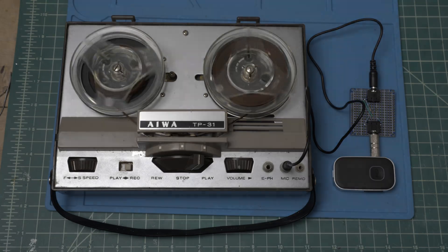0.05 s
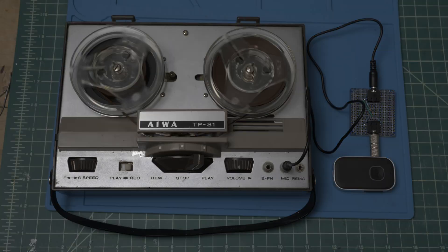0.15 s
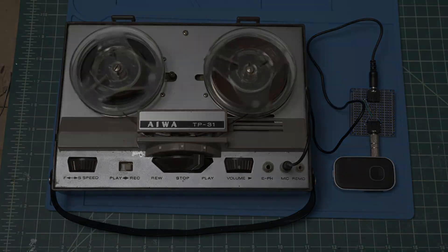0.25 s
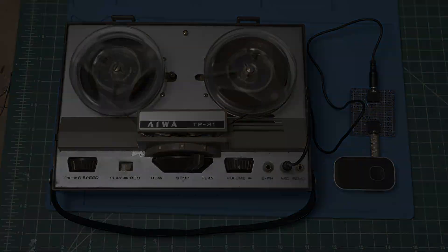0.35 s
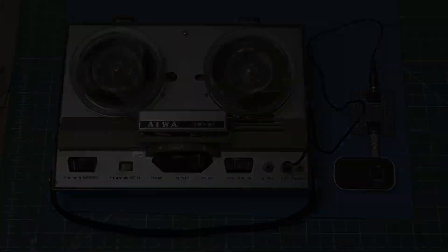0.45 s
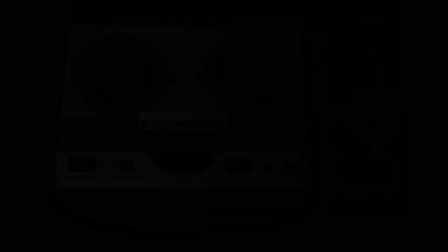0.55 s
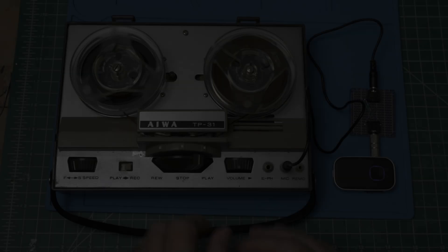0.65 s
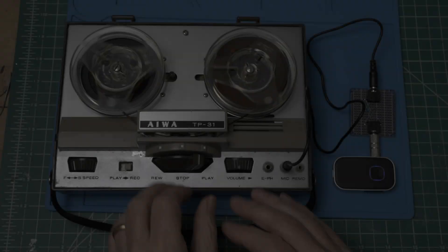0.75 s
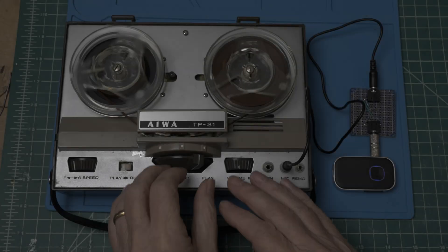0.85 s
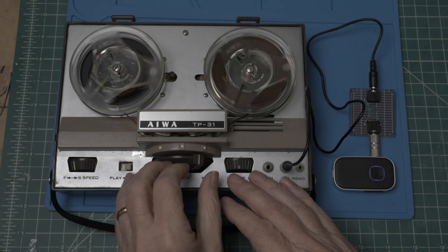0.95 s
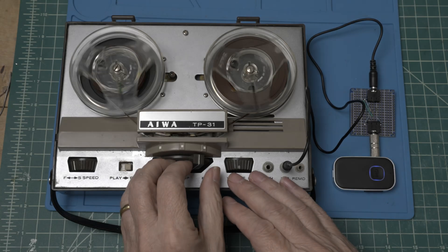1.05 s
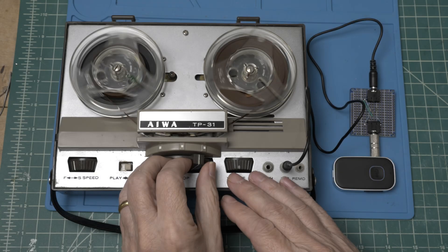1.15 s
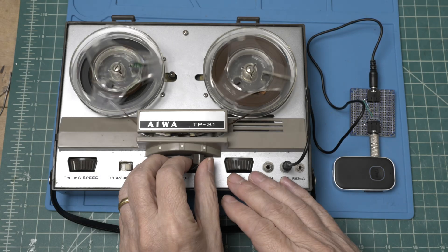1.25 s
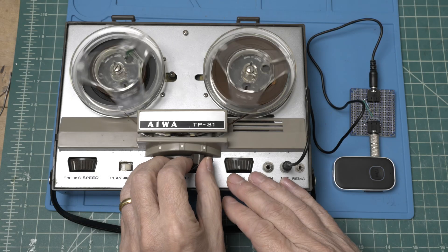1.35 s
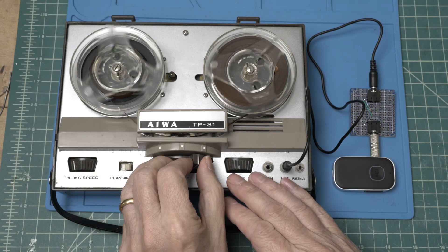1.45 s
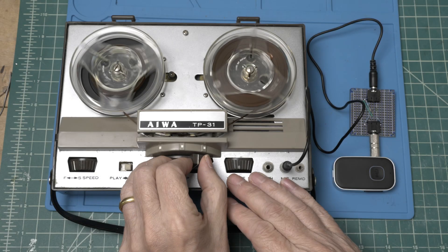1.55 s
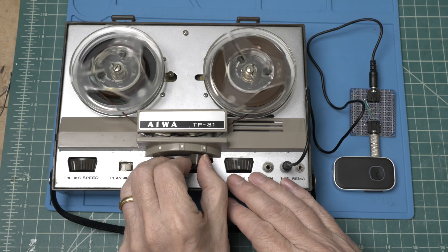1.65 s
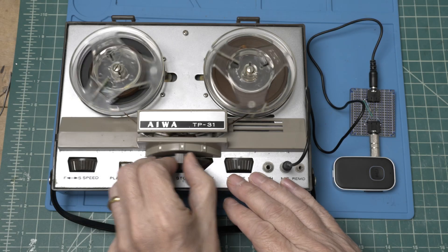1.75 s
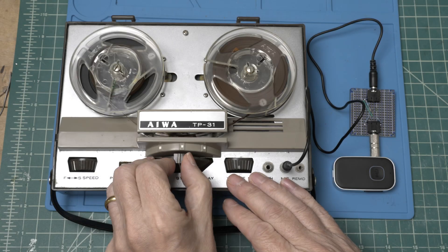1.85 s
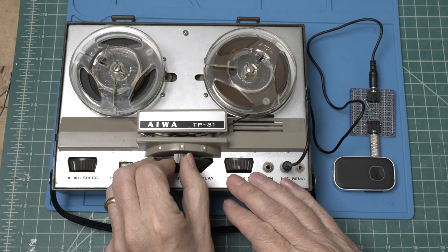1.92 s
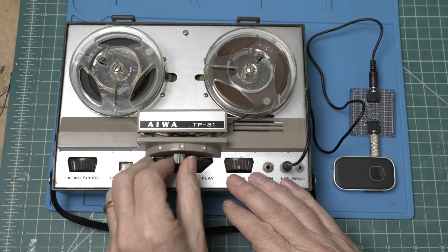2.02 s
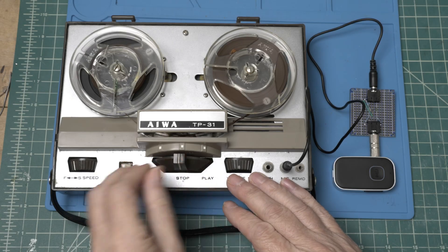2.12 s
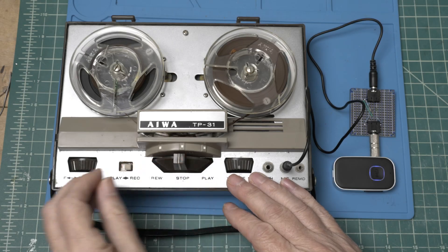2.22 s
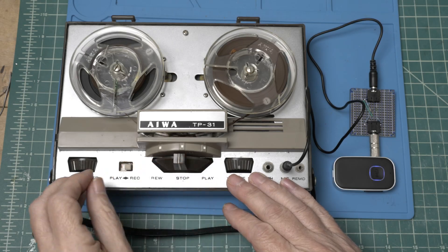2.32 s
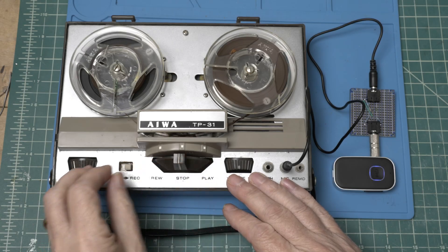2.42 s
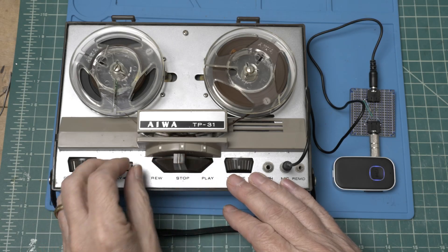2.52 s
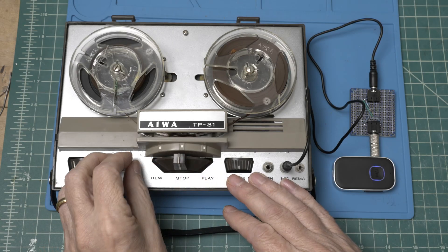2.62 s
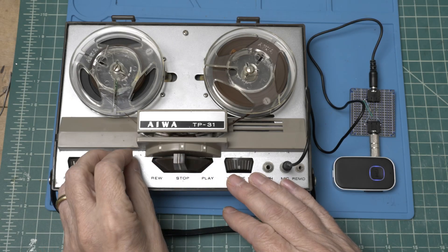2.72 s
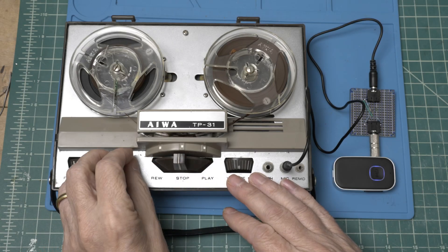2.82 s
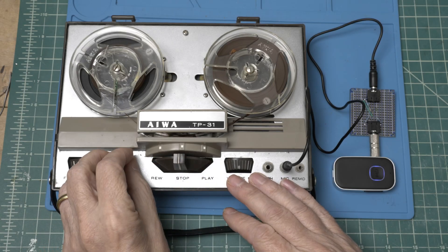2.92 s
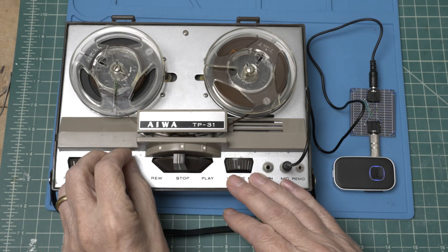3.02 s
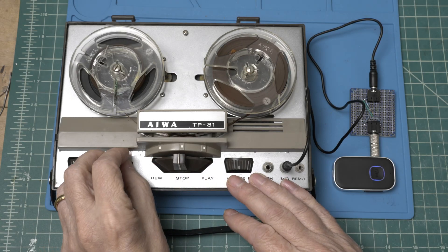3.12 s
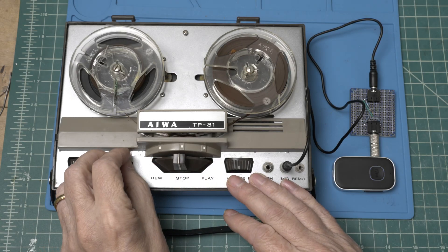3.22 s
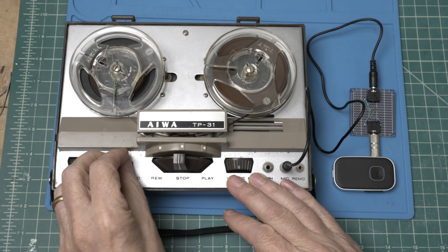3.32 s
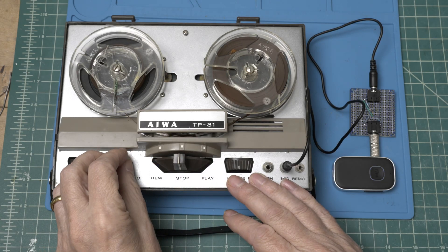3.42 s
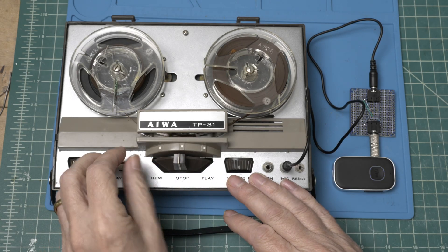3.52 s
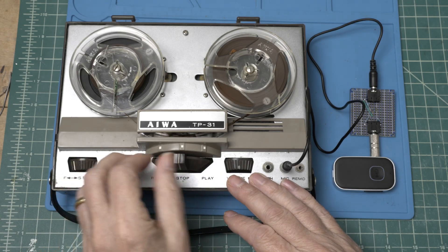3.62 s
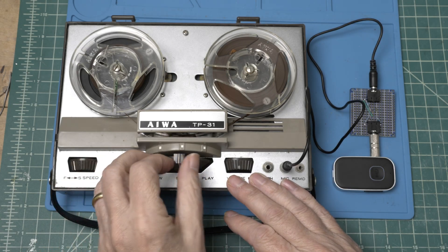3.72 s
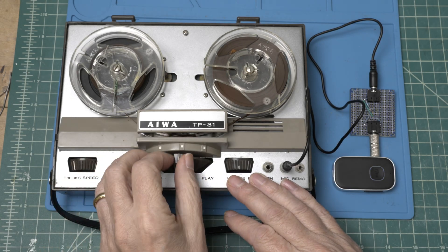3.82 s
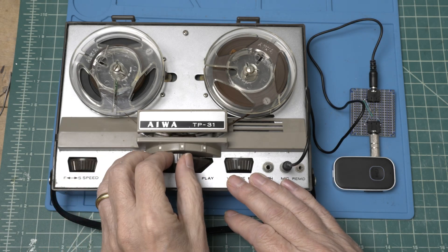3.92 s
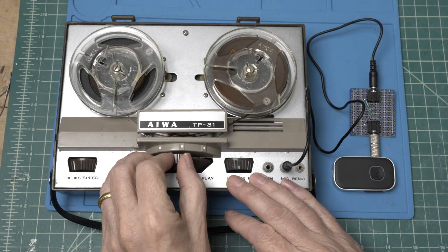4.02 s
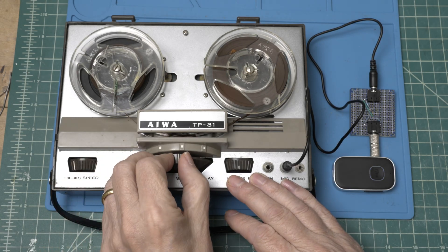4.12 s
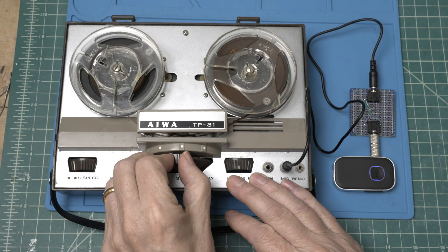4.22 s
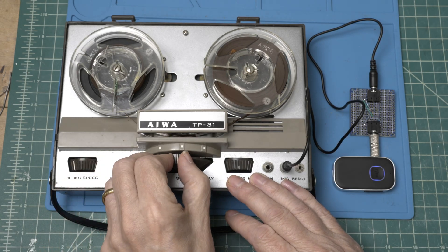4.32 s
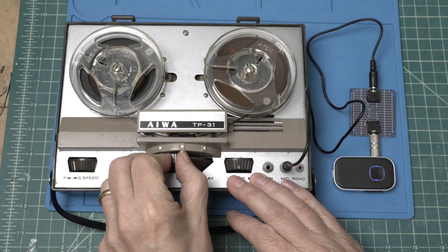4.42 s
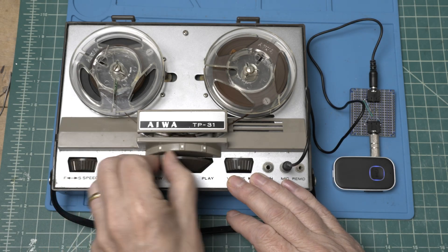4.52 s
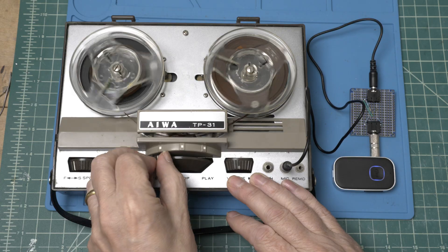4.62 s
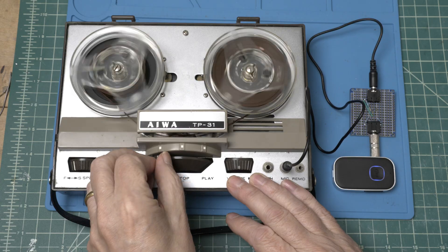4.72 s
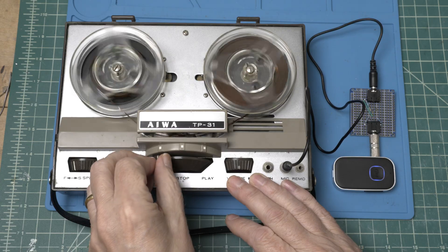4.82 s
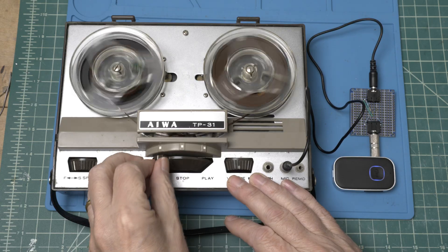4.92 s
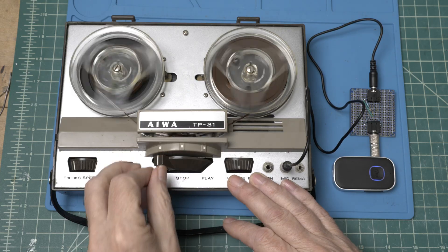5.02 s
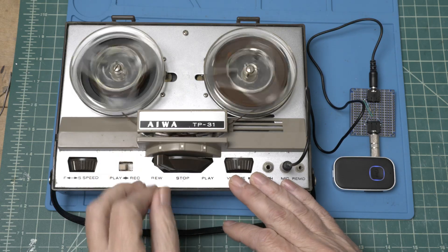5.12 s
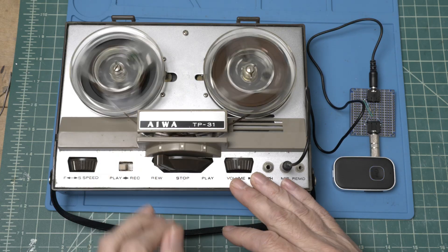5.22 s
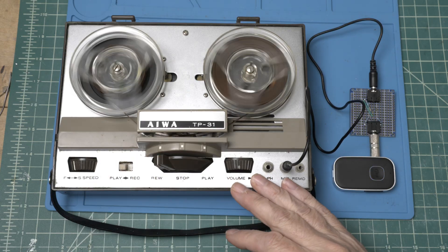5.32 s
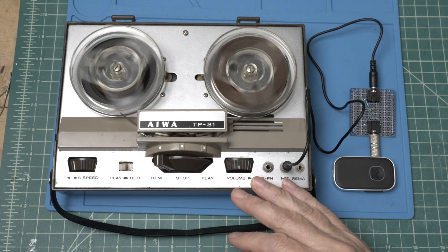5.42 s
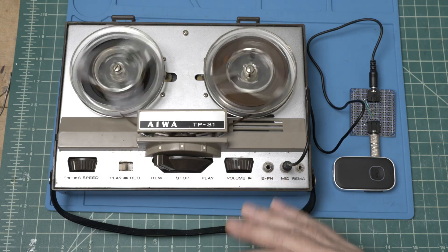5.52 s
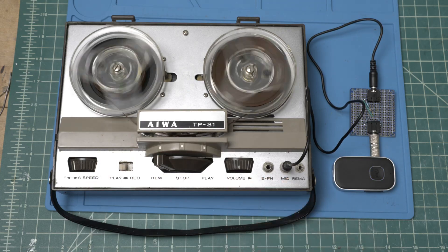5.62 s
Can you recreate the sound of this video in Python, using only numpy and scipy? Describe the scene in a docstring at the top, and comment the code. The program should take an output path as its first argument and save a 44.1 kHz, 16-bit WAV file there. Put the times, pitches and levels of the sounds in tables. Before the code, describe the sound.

Close mechanical clunks and a sharp switch click on a reel-to-reel tape recorder, followed by reels whirring up to speed with a few ticks.

```python
"""On a workbench in a small room, a little reel-to-reel tape recorder, heard up close.
Its motor brushes scratch quietly until fingers turn the lever to stop: the linkage knocks and a spring
pings. A slide switch snaps, then the lever clunks into rewind. The rim drive rattles the chassis,
surging on each turn as the reels gather speed and now and then tick and brush the tape.
Room air, mains hum and a low bench rumble lie underneath."""
import sys
import numpy as np
from scipy import signal
from scipy.fft import rfft, irfft
from scipy.io import wavfile

SR = 44100
rng = np.random.default_rng(int(sys.argv[2]) if len(sys.argv) > 2 else 0)


def materialize(psi):
    """Save the field psi as 16-bit PCM at rate SR to the path in sys.argv[1].

    A 1-D psi becomes a single channel; in a 2-D psi each row is a channel.
    """
    bounded = np.clip(np.atleast_2d(psi).T, -1, 1)
    quanta = np.round(bounded * 32767).astype(np.int16)
    wavfile.write(sys.argv[1], SR, quanta)


N = 249517

# Tone curves of the noisy layers. Each row: frequency in Hz, gain in dB.
AIR_EQ = [(20, -23), (45, -13.5), (90, -0.5), (200, -11), (400, -10), (700, -14.5), (1100, -13.5),
          (2300, -23), (3600, -19.5), (5000, -32.5), (12000, -29), (16000, -28)]
MOTOR_EQ = [(180, -72.5), (300, -41), (511, -8.5), (555, -17), (584, 2.5), (828, -28.5), (1010, -25.5),
            (1250, -10), (1510, -29), (1780, -6), (2280, -2.5), (5340, -9.5), (6300, -21.5), (10400, -14.5),
            (16000, -39.5)]
FINGER_EQ = [(180, -39), (300, -19), (593, -7.5), (801, -16), (961, 1.5), (1060, -2.5), (2320, -3.5),
             (6200, -16), (10400, -20.5), (16000, -28)]
PANEL_EQ = [(30, -57.5), (100, -31), (330, -32), (450, -8.5), (700, -5.5), (1500, -5), (2200, -5),
            (3200, 0), (4500, -14.5), (7000, -20), (11000, -26.5), (16000, -35)]   # the many small resonances between the chassis modes
SCRAPE_EQ = [(400, -36.5), (1500, -13.5), (3000, -5.5), (4200, -5.5), (6000, -18.5), (9000, -35),
             (16000, -43)]   # bright edge of the linkage
SWITCH_EQ = [(150, -32), (380, -27.5), (550, -14), (1000, -8.5), (2000, -11), (3400, 1.5), (4600, -8.5),
             (7000, -8), (11000, -11.5), (16000, -23)]
SWITCH_TAIL_EQ = [(150, -30), (500, -27), (1100, -6), (2000, -9), (3500, 0.5), (5800, 5), (8000, -8.5),
                  (11000, -10), (16000, -23.5)]
# Bodies that ring. Each row: frequency in Hz, width in Hz, gain in dB.
BENCH_MODES = [(62, 9, -3.5), (80, 11, 1), (132, 12, -7), (172.6, 16, -12), (208, 17, -8.5), (247, 4, -13)]
MOTOR_HOUSING_MODES = [(588, 14, -5), (965, 17, -8), (1250, 23, -11.5), (1830, 30, -11), (2314, 60, 0.5),
                       (3000, 160, 1), (3290, 50, -2), (3613, 99, 3), (4350, 24, -11), (5280, 250, -11.5),
                       (6960, 150, -11.5), (9045, 80, -17.5), (10300, 500, -23)]
CHASSIS_MODES = [(419.2, 27, -0.5), (462.4, 26, 5.5), (532.6, 52, 2), (597, 40, 0.5), (676, 58, -2),
                 (739, 15, -0.5), (920, 40, -7), (972, 22, 2), (1315, 40, -5), (1470, 45, -5),
                 (1664, 25, -6), (2180, 16, 0.5), (2529, 36, -1.5), (2678, 55, 4.5), (2850, 23, -2.5),
                 (3137, 90, 4.5), (3260, 80, -2), (3540, 63, -14), (4140, 30, -12.5), (4450, 35, -17)]
# Mains hum. Each row: frequency in Hz, rms level in dB once fully swelled.
HUM_PARTIALS = [(60, -80.5), (120, -67), (240, -85.5)]
# The motor's slow run. Each row: time in seconds, turns per second.
MOTOR_SPEED = [(0, 34.7), (.7, 36.2)]
# Soft swells. Each row: peak time in seconds, swell time in seconds, level in dB.
FINGER_RUBS = [(.77, 0.098, -58), (.96, 0.024, -64), (1.14, 0.067, -63.5), (2.09, 0.031, -69),
               (3.54, 0.033, -72), (3.92, 0.035, -67.5), (4.295, 0.029, -47.5), (4.375, 0.014, -53.5),
               (4.555, 0.016, -54)]
HISS_SWELLS = [(2.15, .1, -70.5), (2.68, .09, -76), (4.05, .14, -76.5)]
BENCH_THUMPS = [(1.85, .04, -54.5), (4.28, .03, -55)]   # the machine rocks as the lever is turned
TAPE_SWISHES = [(4.915, 0.014, -51.5), (5.17, 0.026, -54)]
# Hits. Each row: start in seconds, case, deck plate and crack levels in dB before their trims,
# chatter length in seconds, chassis ring in dB.
CONTROL_KNOCKS = [(.928, -59, -68, -73, 0.013, -18), (1.085, -59.5, -72, -77, 0.013, -7),
                  (1.7403, -46.5, -42.5, -68, 0.0017, 3.5), (1.7588, -30.5, -22.5, -47, 0.01, -3.5),
                  (1.8155, -38.5, -41, -47, 0.0043, -4), (1.8225, -32, -43, -43.5, 0.0069, -13),
                  (3.473, -64, -62, -63.5, 0.0055, -11), (3.9055, -54, -55, -64.5, 0.0059, -20),
                  (4.254, -32, -50, -43, 0.013, -2), (4.314, -46, -55, -62, 0.0062, -7),
                  (4.399, -70, -57.5, -73, 0.0055, -18), (4.5755, -29, -23, -33.5, 0.0022, -30),
                  (4.5785, -32, -15.5, -32.5, 0.00084, -24), (4.5975, -27, -29, -33.5, 0.003, -18)]   # fingers, lever and linkage
REEL_TICKS = [(5.071, -33, -33, -54, 0.0049, -18), (5.106, -40.5, -35.5, -38.5, 0.016, 3),
              (5.3925, -26.5, -21.5, -49.5, 0.0034, -10), (5.425, -39, -35.5, -35, 0.012, -3)]   # flanges and tape catching
# Loose linkage. Each row: start in seconds, level in dB, hold in seconds, fall in dB per second.
LINKAGE_SHAKES = [(1.76, -40, 0.089, 219), (4.245, -54, 0.031, 98), (4.581, -27.5, 0.062, 131)]
# The spring. Each row: start in seconds, level in dB, pitch in Hz.
SPRING_PINGS = [(1.798, -62, 14500), (1.8153, -45, 11300), (1.844, -53, 9900)]
# The slide switch. One row: start in seconds, level in dB, chatter length in seconds.
SWITCH_SNAP = (3.1397, -23.5, 0.0046)
# Layers of the rewind. Each row: full-speed level in dB, exponent on speed, surge in dB (negative
# for a dip), time of one surge in seconds.
WIND_CASE_BOOM = (-37.5, 1.5, 5, 4.5)
WIND_PLATE_RATTLE = (-35, 1.5, 0.5, 4.5)
WIND_TAPE_HISS = (-51, 1.07, -1, 3)
# Room tail. Each row: frequency in Hz, seconds to fall by 60 dB.
ROOM_DECAY = [(200, .3), (700, 0.38), (1500, 0.22), (4000, 0.38), (8000, 0.15), (15000, 0.16)]

CASE_TOP_HZ, PLATE_TOP_HZ = 1900, 5000
TIME = np.arange(N) / SR


def from_db(db):
    return 10 ** (np.asarray(db) / 20)


def unit_rms(x):
    return x / np.sqrt(np.mean(x ** 2) + 1e-20)


def at_hz(points, hz):
    """Read a curve on a log-frequency axis."""
    known, values = np.transpose(points)
    return np.interp(np.log(np.maximum(hz, 1)), np.log(known), values)


def drift(per_s):
    """A smooth random wander, roughly of unit size."""
    knots = rng.standard_normal(4096)
    return np.interp(TIME * per_s, np.arange(len(knots)), knots)


def ramp(start_s, rise_s):
    """A straight fade from 0 to 1."""
    return np.clip((TIME - start_s) / rise_s, 0, 1)


def swells(rows):
    """An envelope of rounded rises and falls."""
    return sum(from_db(db) / np.cosh(np.minimum(np.abs(TIME - peak_s) / swell_s, 20))
               for peak_s, swell_s, db in rows)


def bandpass(x, low_hz, high_hz):
    return signal.sosfilt(signal.butter(4, [low_hz, high_hz], "band", fs=SR, output="sos"), x)


def crossover(x, hz):
    """Lows and highs, in phase so that they add up without a notch."""
    sections = [signal.butter(2, hz, kind, fs=SR, output="sos") for kind in ("low", "high")]
    return [signal.sosfilt(np.vstack([sos, sos]), x) for sos in sections]


def three_bands(x, low_hz, high_hz):
    lows, rest = crossover(x, low_hz)
    mids, highs = crossover(rest, high_hz)
    return lows, mids, highs


def equalise(x, curve, size=4096):
    """Minimum-phase EQ: nothing rings ahead of an attack."""
    gain = from_db(at_hz(curve, np.fft.rfftfreq(size, 1 / SR)))
    cepstrum = irfft(np.log(gain))
    cepstrum[1:size // 2] *= 2
    cepstrum[size // 2 + 1:] = 0
    impulse = irfft(np.exp(rfft(cepstrum)))
    return signal.oaconvolve(x, impulse)[:len(x)]


def resonate(x, modes):
    """Parallel resonances of alternating sign."""
    out = 0
    for k, (hz, width_hz, db) in enumerate(modes):
        radius = np.exp(-np.pi * width_hz / SR)
        poles = [1, -2 * radius * np.cos(2 * np.pi * hz / SR), radius ** 2]
        gain = (-1) ** k * from_db(db) * (1 - radius ** 2) / 2
        out = out + gain * signal.lfilter([1, 0, -1], poles, x + 1e-18)
    return out


def grains(per_s, spread_db, size=N):
    """Tiny contacts at random moments, of uneven strength."""
    strength = from_db(spread_db * np.minimum(rng.exponential(1, size), 4))
    polarity = rng.choice([-1, 1], size)
    return strength * polarity * (rng.random(size) < per_s / SR)


def chatter(length_s, settle_db, settle_s, size=12000):
    """Force of one hit: a burst of contacts, then weaker ones as the parts settle."""
    t = TIME[:size]
    burst = np.exp(-(t / length_s) ** 4)
    settling = from_db(settle_db) * np.exp(-t / settle_s)
    return grains(16000, 1.5, size) * (burst + settling)


def at_level(x, db):
    """Set the rms level of a hit's first 20 ms."""
    return from_db(db) * x / np.sqrt(np.mean(x[:SR // 50] ** 2) + 1e-20)


def add(out, start_s, x):
    start = int(start_s * SR)
    out[start:start + len(x)] += x[:N - start]


def room_air(level_db):
    """Still air: a soft, dark bed of noise."""
    return from_db(level_db) * unit_rms(equalise(rng.standard_normal(N), AIR_EQ))


def mains_hum():
    """Low harmonics of the mains that swell a little, then hold."""
    hum = sum(from_db(db) * np.sqrt(2) * np.sin(2 * np.pi * (hz * TIME + rng.random()))
              for hz, db in HUM_PARTIALS)
    swell_db = np.interp(TIME, [1.4, 2.3], [-6, 0])
    return hum * from_db(swell_db)


def bench_rumble(rest_db, hands_db, wind_db):
    """The bench rings low, more so as hands lean on it, the machine rocks and the reels wind."""
    rumble = bandpass(resonate(rng.standard_normal(N), BENCH_MODES), 52, 320)
    leaning = from_db(hands_db) * ramp(start_s=2.15, rise_s=0.46)
    gain = from_db(rest_db) + leaning + from_db(wind_db) * wind_speed() + swells(BENCH_THUMPS)
    return gain * unit_rms(rumble)


def motor(level_db, stop_s, coast_s, wobble, clicks_db, housing_db):
    """Brushes scratch and click seven times a turn, ringing the housing and fading as the rotor stops."""
    running = TIME < stop_s
    speed = np.exp(-(np.maximum(TIME - stop_s, 0) / coast_s) ** 2)
    turn_hz = np.interp(TIME, *np.transpose(MOTOR_SPEED)) * speed
    angle = 2 * np.pi * np.cumsum(turn_hz * (1 + wobble * drift(8))) / SR
    pressure = np.exp(0.2 * np.cos(2 * angle) + 0.2 * np.cos(7 * angle))
    scratch = grains(12000, 1.7) * pressure
    clicks = np.diff(np.exp(300 * (np.cos(7 * angle) - 1)), prepend=1)
    force = scratch / np.std(scratch[running]) + from_db(clicks_db) * clicks / np.std(clicks[running])
    whirr = equalise(force, MOTOR_EQ) + from_db(housing_db) * resonate(force, MOTOR_HOUSING_MODES)
    return from_db(level_db) * speed * whirr / np.std(whirr[running])


def bearing_squeak(peak_s, swell_s, hz, level_db):
    """A reel bearing sings briefly, with a slight waver."""
    phase = 2 * np.pi * np.cumsum(hz * (1 + 0.0056 * drift(35))) / SR
    return from_db(level_db) * np.exp(-((TIME - peak_s) / swell_s) ** 2) * np.sin(phase)


def fingers():
    """Skin drags over the case and controls in small slips."""
    gain = swells(FINGER_RUBS) * from_db(1.1 * drift(45))
    return gain * unit_rms(equalise(grains(5000, 3), FINGER_EQ))


def chassis(force, ring_db):
    """Strong modes ring over a bed of small panel resonances."""
    return from_db(ring_db) * resonate(force, CHASSIS_MODES) + equalise(force, PANEL_EQ)


def hits(rows, trims_db, plate_hz, plate_width_hz, snap_db, settle_db, settle_s, rise_s):
    """Where a hit lands sets its mix of case, deck plate and crack; a glancing one has a soft attack."""
    out = np.zeros(N)
    for start_s, *levels_db, length_s, ring_db in rows:
        force = chatter(length_s, settle_db, settle_s)
        force *= ramp(0, rise_s)[:len(force)]
        snap = resonate(force, [(plate_hz, plate_width_hz, snap_db)])   # dies within milliseconds
        bands = three_bands(chassis(force, ring_db) + snap, CASE_TOP_HZ, PLATE_TOP_HZ)
        add(out, start_s, sum(map(at_level, bands, np.add(levels_db, trims_db))))
    return out


def linkage(attack_s, scrape_db):
    """Loose levers and idler rattle on the chassis after each throw, then settle."""
    force = grains(7000, 3.2) * from_db(0.6 * drift(150))
    gain = sum(ramp(start_s, attack_s) * from_db(db - fall * np.maximum(TIME - start_s - hold_s, 0))
               for start_s, db, hold_s, fall in LINKAGE_SHAKES)
    scrape = from_db(scrape_db) * equalise(force, SCRAPE_EQ)
    return gain * unit_rms(chassis(force, ring_db=0.5) + scrape)


def spring(width_hz):
    """A small spring, plucked as the lever lands, gives thin, very high pings."""
    out = np.zeros(N)
    for start_s, db, hz in SPRING_PINGS:
        pluck = chatter(length_s=0.0017, settle_db=-17.5, settle_s=0.01)
        add(out, start_s, at_level(resonate(pluck, [(hz, width_hz, 0)]), db))
    return out


def faint_hiss(hz, width_hz):
    """A thin band of hiss comes and goes in the pauses."""
    peak = [(hz, width_hz, 0)]
    return swells(HISS_SWELLS) * unit_rms(resonate(resonate(rng.standard_normal(N), peak), peak))


def slide_switch(settle_db, settle_s, tail_db, tail_t60_s):
    """The switch snaps over, short and bright, and leaves a smooth hissing tail."""
    start_s, level_db, length_s = SWITCH_SNAP
    out = np.zeros(N)
    snap = equalise(chatter(length_s, settle_db, settle_s), SWITCH_EQ)
    add(out, start_s, at_level(snap, level_db))
    t = TIME[:SR // 2]
    tail = unit_rms(equalise(rng.standard_normal(len(t)), SWITCH_TAIL_EQ))
    add(out, start_s, from_db(tail_db - 60 * t / tail_t60_s) * tail)
    return out


def wind_speed(start_s=4.585, spin_up_s=0.41, start_share=0.22):
    """Share of full winding speed: a jerk as the wheel engages, then an ever slower rise."""
    since_s = np.maximum(TIME - start_s, 0)
    return ramp(start_s, 0.018) * (1 - (1 - start_share) * np.exp(-since_s / spin_up_s))


def reel_gain(layer, reel_hz):
    """A layer grows with speed and surges or dips once a turn, as its reel runs out of true."""
    db, exponent, surge_db, peak_s = layer
    surge = np.cos(np.pi * reel_hz * (TIME - peak_s)) ** 4
    return wind_speed() ** exponent * from_db(db + surge_db * surge)


def rim_drive(wheel_hz, driven_reel_hz, free_reel_hz, throb_db, rough_db, boom_hz, boom_db):
    """The wheel chatters on the reel rims, harder once a turn; the chassis shakes and the case booms."""
    angle = 2 * np.pi * np.cumsum(wheel_hz * (1 + 0.0068 * drift(4.1))) / SR
    force = grains(3500, 2.5) * from_db(throb_db * np.cos(angle) + rough_db * drift(110))
    body = chassis(force, ring_db=2.5) - resonate(force, [(boom_hz, 12, boom_db)])
    case, plate, tape = map(unit_rms, three_bands(body, 850, PLATE_TOP_HZ))
    return (case * reel_gain(WIND_CASE_BOOM, driven_reel_hz)
            + plate * reel_gain(WIND_PLATE_RATTLE, driven_reel_hz)
            + tape * reel_gain(WIND_TAPE_HISS, free_reel_hz))


def tape_swish(hz, width_hz):
    """The tape's edge brushes a reel flange with a short, airy hiss."""
    edge = [(hz, width_hz, 0)]
    return swells(TAPE_SWISHES) * unit_rms(resonate(resonate(grains(9000, 2), edge), edge))


def room(x, wet_db, predelay_s):
    """Diffuse reflections fade in, then die away band by band."""
    t = TIME[:SR // 2]
    noise = rng.standard_normal(len(t))
    edges_hz = np.geomspace(100, 18000, 9)
    tail = sum(bandpass(noise, low, high) * from_db(-60 * t / at_hz(ROOM_DECAY, np.sqrt(low * high)))
               for low, high in zip(edges_hz, edges_hz[1:]))
    tail *= np.clip(t / predelay_s - 1, 0, 1)
    return x + from_db(wet_db) * signal.fftconvolve(x, tail / np.linalg.norm(tail))[:N]


def scene():
    """Controls and transport play into the room, over a quiet bed, in mono."""
    knocks = hits(CONTROL_KNOCKS, trims_db=(-0.47, 0.34, -3), plate_hz=2782, plate_width_hz=330,
                  snap_db=-5, settle_db=-23, settle_s=0.022, rise_s=0.00039)
    ticks = hits(REEL_TICKS, trims_db=(0.2, -1.5, 0.7), plate_hz=2690, plate_width_hz=160,
                 snap_db=18.5, settle_db=-14, settle_s=0.0087, rise_s=0.0035)
    running = motor(level_db=-61.5, stop_s=1.82, coast_s=0.2, wobble=0.0022,
                    clicks_db=-12.5, housing_db=3.5)
    running += bearing_squeak(peak_s=0.525, swell_s=0.11, hz=617, level_db=-69.5)
    rewind = rim_drive(wheel_hz=43.82, driven_reel_hz=6.24, free_reel_hz=6.3,
                       throb_db=1.5, rough_db=1.8, boom_hz=470, boom_db=-6)
    rewind += tape_swish(hz=9450, width_hz=5800)
    snap = slide_switch(settle_db=-7.5, settle_s=0.011, tail_db=-39, tail_t60_s=0.41)
    controls = knocks + linkage(attack_s=0.031, scrape_db=1.5) + spring(width_hz=450) + snap + fingers()
    bed = room_air(level_db=-71.5) + mains_hum() + bench_rumble(rest_db=-75, hands_db=-69, wind_db=-58)
    bed += faint_hiss(hz=3620, width_hz=800)
    machine = controls + ticks + running + rewind
    return (room(machine, wet_db=-15.5, predelay_s=0.0026) + bed)[None]


def record(dry):
    """Round off the loudest peaks and cut the top steeply."""
    rounded = 0.95 * np.tanh(dry / 0.95)
    return signal.sosfilt(signal.ellip(10, 0.1, 80, 15900, fs=SR, output="sos"), rounded)


dry = scene()
out = record(dry)
materialize(out)
```